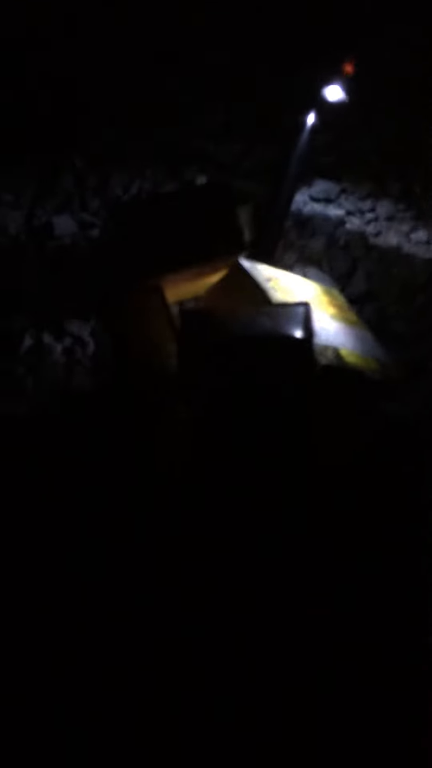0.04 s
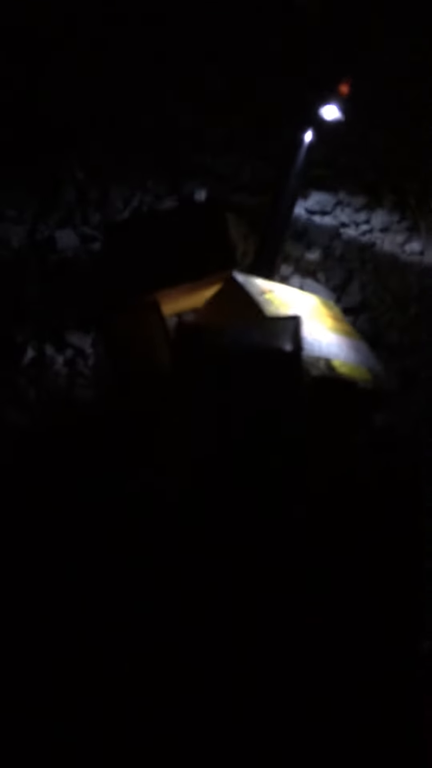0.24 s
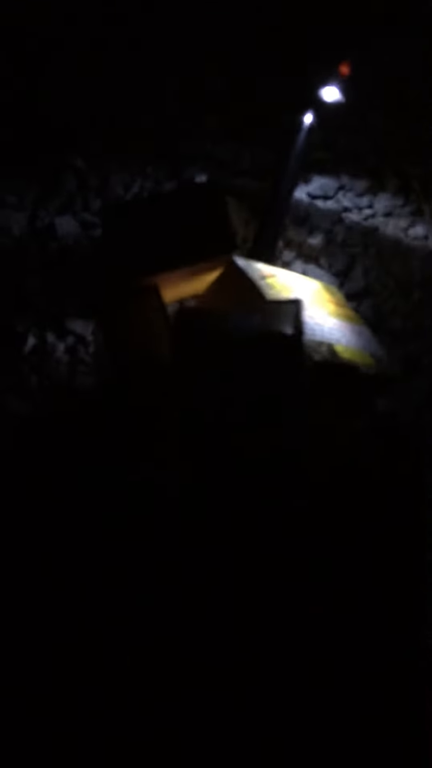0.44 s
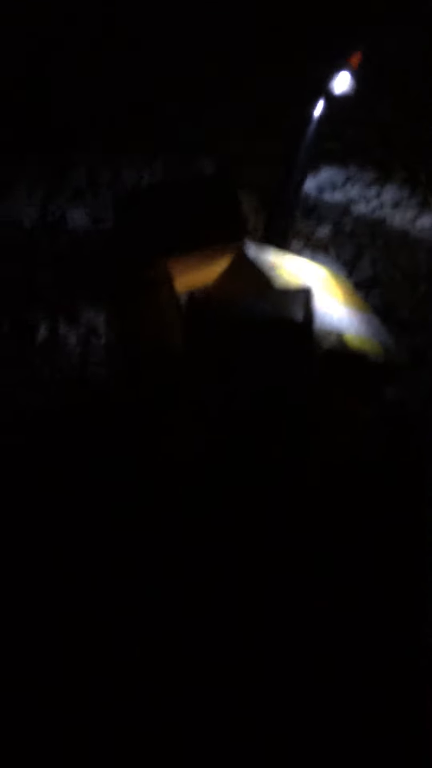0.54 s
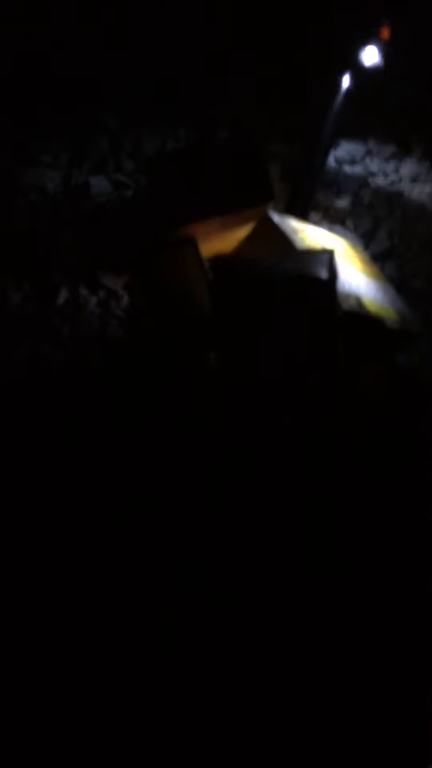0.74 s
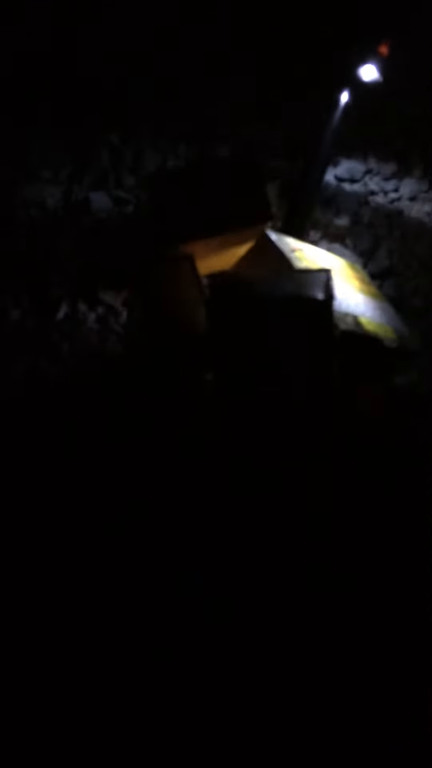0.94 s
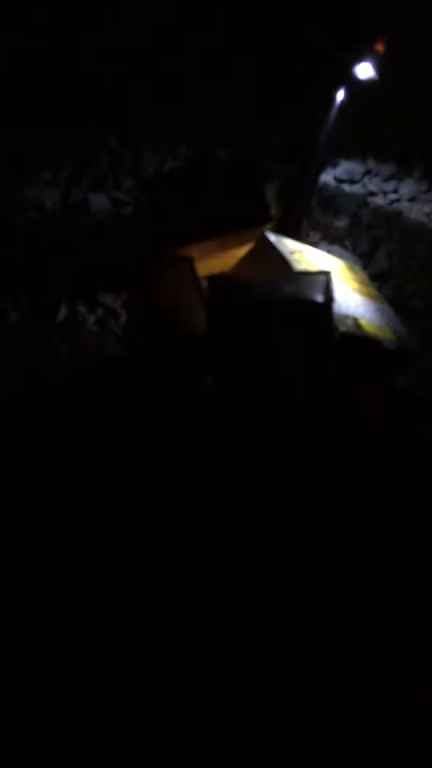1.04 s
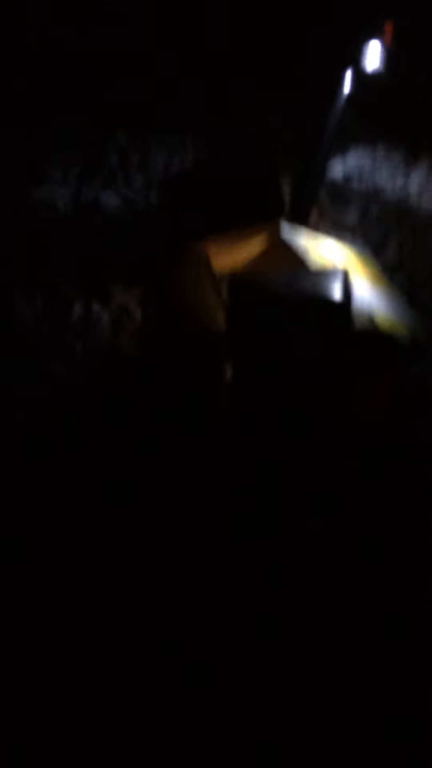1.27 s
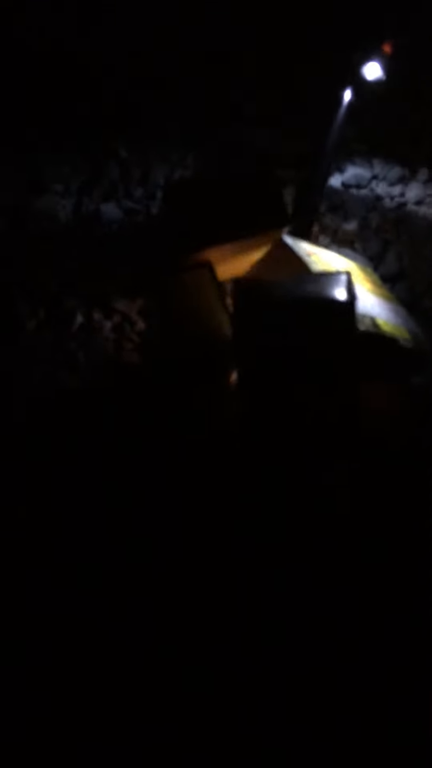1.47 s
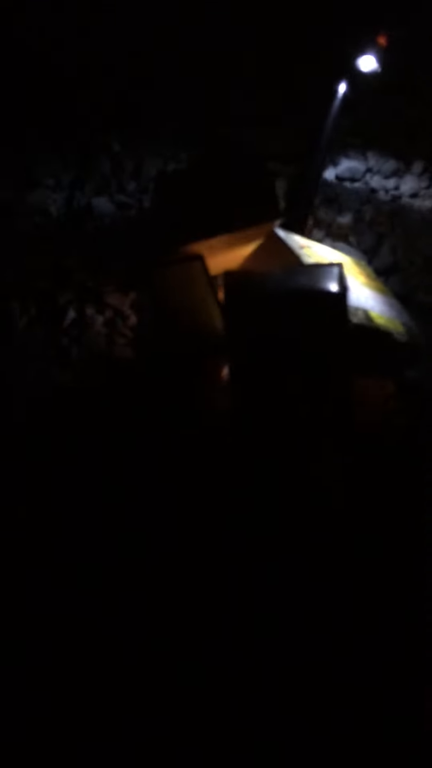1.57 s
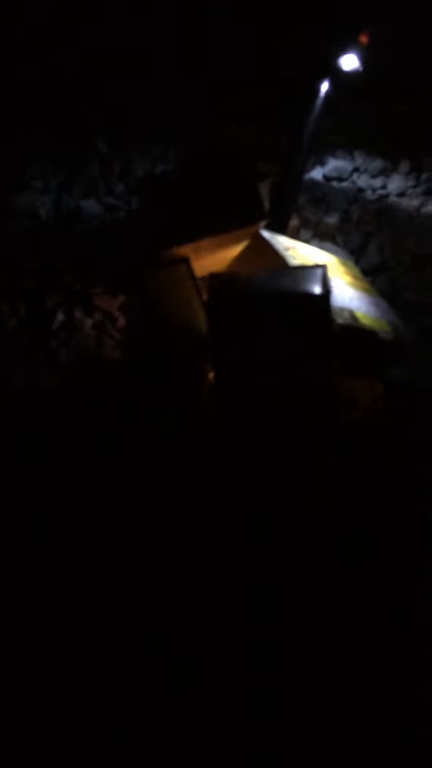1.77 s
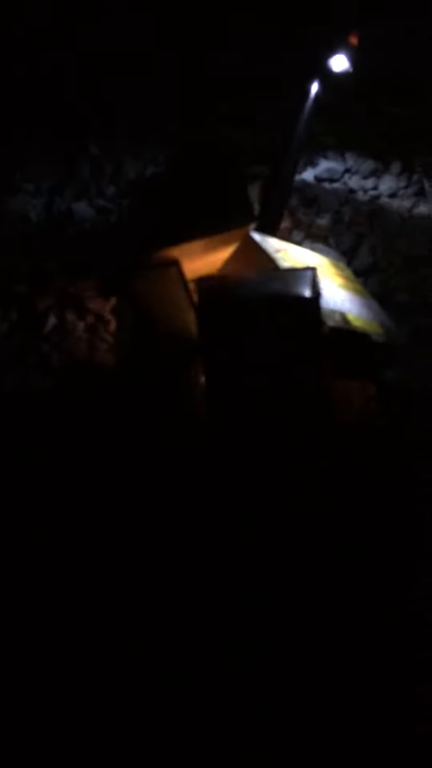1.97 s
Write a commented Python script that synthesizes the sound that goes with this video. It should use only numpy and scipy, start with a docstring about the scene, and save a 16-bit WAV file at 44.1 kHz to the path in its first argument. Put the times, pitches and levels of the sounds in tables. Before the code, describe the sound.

Crickets sing throughout in a dense, high, shimmering trill that swells nearly four times a second, above a steadier lower group and faint, wavering tree crickets. Close by, soft ticks and rustles come around 0.45-0.65 seconds, a short gritty crunch at 0.83-0.9, light rustles from 1.26, and a tiny bright snap at 1.83 with rustling after. Soft outdoor air, thin hiss and distant traffic rumble lie behind.

```python
"""A dense chorus of high crickets swells in step nearly four times a second, over a steady lower group
and a few tree crickets that come and go: random scraper slips ring wing resonances.
Close by, grit crunches and rustles as clusters of tiny grains; ticks and one bright snap are dying modes.
Behind lie soft air, a thin treble hiss and far traffic rumble, all shaped noise."""
import sys
import numpy as np
from scipy import signal
from scipy.fft import rfft, irfft
from scipy.io import wavfile
from scipy.ndimage import uniform_filter1d

SR = 44100
rng = np.random.default_rng(int(sys.argv[2]) if len(sys.argv) > 2 else 0)


def ratio(d):
    """dB to gain"""
    e = np.asarray(d, float) / 20
    return 10 ** e


def store_wav(level_fs):
    """Save 16-bit WAV to argv[1]."""
    pcm = np.round(np.clip(np.atleast_2d(level_fs), -1, 1) * 32767)
    wavfile.write(sys.argv[1], SR, pcm.T.astype(np.int16))


N = 88729  # length in samples

# Cricket groups: pitch_hz (middle), spread_hz (scale between singers), width_hz (wing resonance),
# strokes_per_s, stroke_depth (limited to 0-1), level_db
HIGH_CRICKETS = (7065, 184, 384, 59.5, 0.34, -50)
LOWER_CRICKETS = (6280, 240, 460, 50.5, -3, -60.5)
TREE_CRICKETS = (3024.5, 39.5, 109, 72, .7, -65)
TEETH_PER_S = 1000  # mean scraper slips of each singer
SWELL_PER_S, SWELL_TOP_S, SWELL_DB = 3.705, 1.041, 3  # rate, time near one top, swing up and down
SWELL_SKEW = 0.04  # radians
OVERTONE_DB = -29  # second partial of the high group, relative to the first
# Coming and going of the tree crickets: time_s, level_db (relative, evened to unit rms)
TREE_LEVEL = [(0, -62.5), (.33, -68), (.5, -61.5), (.82, -60), (1.1, -67.5), (1.24, -60), (2.01, -62.5)]

# Crunches of grit: start_s, length_s, level_db, treble_db
CRUNCHES = [(0.8262, 0.017, -56.5, -1), (0.838, 0.0099, -55.5, -16), (0.861, .005, -64, -16),
            (0.875, 0.012, -58.5, -10), (.881, 0.0145, -55, -18)]
# Soft rustles: start_s, length_s, level_db, treble_db
RUSTLES = [(0.458, 0.074, -62.5, -4.5), (0.579, 0.044, -70, 8), (.845, 0.029, -65, -3),
           (1.258, 0.12, -66.5, -2.5), (1.549, 0.032, -68.5, 0), (1.616, 0.068, -67.5, 2),
           (1.853, 0.2, -66, 3), (1.918, 0.036, -69, 17)]
# Colour of the breaking grains: frequency_hz, relative_level_db
GRIT_COLOUR = [(250, -9), (700, 5), (1300, 6), (2300, -0.5), (4000, -0.5), (6000, -1), (9000, -10),
               (15000, -14)]
GRAINS_PER_S, GRAIN_SPREAD_DB, GRAIN_T60_S = 3000, 4, .004
# Single ticks: start_s, level_db (peak before decay), pitch_hz, t60_s
TICKS = [(.4455, -36, 1900, .006), (.47, -42, 1700, .003), (.483, -41, 1200, .005),
         (.637, -37, 3500, .0012), (.8855, -33, 2000, .003), (1.8615, -42, 2300, .003),
         (1.958, -43, 5000, .003)]
# Modes of the snap: pitch_hz, relative_level_db, t60_s
SNAP_MODES = [(2200, -18, 0.0033), (4650, -8, .003), (5400, -8, 0.004), (6800, -4, 0.0018),
              (8560, -1, 0.0039), (10750, 1.5, 0.0064), (12000, -6, 0.0022), (13500, -7, .002)]
SNAP_S, SNAP_DB, SNAP_BREAK_S = 1.8257, -41, 0.0029  # start, level, span of the cracks

# Colour of the soft air: frequency_hz, relative_level_db (per Hz)
AIR_COLOUR = [(180, -1), (300, -2.5), (785, -6.5), (1040, -11), (1320, -9.5), (2590, -15), (2990, -10),
              (3550, -17), (5500, -16.5), (7150, -14), (12100, -120)]
# Colour of the thin treble hiss: frequency_hz, relative_level_db (per Hz)
HISS_COLOUR = [(5000, -8), (7500, -12), (8500, -13), (9600, -8), (10800, -1), (13000, 0), (15300, 0),
               (17000, -3)]
AIR_DB, HISS_DB = -58, -75.5
# Colour of the far traffic: frequency_hz, relative_level_db (per Hz)
RUMBLE_COLOUR = [(12, -47), (20, -47), (49, 1), (85, -1), (152, -1.5), (256, -12), (420, -21), (550, -39),
                 (920, -120)]
# Rise and fall of the far traffic: time_s, level_db
RUMBLE_LEVEL = [(0, -47), (.3, -49.5), (.5, -50.5), (.7, -48.5), (1.15, -49), (1.3, -51), (1.5, -50),
                (1.72, -54), (1.8, -48), (1.92, -45), (2.01, -50)]
PATCH_DB = 1.5  # rms unevenness of the noise over time and frequency

MIC_LOW_HZ, EDGE_HZ = 42, 15320  # microphone bass cut, upper band limit


def evened(x):
    """Scales a sound or gain to unit rms."""
    return x / np.sqrt(np.mean(x ** 2) + 1e-20)


def read(points, hz):
    """Reads a colour table in dB on a log frequency axis, near silent outside it."""
    f, value = np.transpose(points)
    return np.interp(np.log(hz + 1), np.log(f + 1), value, -100, -100)


def level(curve):
    """Turns a (time_s, level_db) curve into a gain for every sample."""
    return ratio(np.interp(np.arange(N) / SR, *np.transpose(curve)))


def add(mix, start_s, sound):
    """Mixes a sound in at its start time."""
    part = mix[round(start_s * SR):][:len(sound)]
    part += sound[:len(part)]


def chorus(hz, spread_hz, width_hz, strokes_per_s, depth, level_db, count, overtone_db=-200):
    """Each singer scrapes its file in wing strokes; the slips ring a wing resonance of its own pitch."""
    t, wing_t = np.arange(N) / SR, np.arange(2048) / SR
    depth = np.clip(depth, 0, 1)
    low, high = 0, 0
    for place, (pace, phase) in zip(np.linspace(-1, 1, count), rng.random((count, 2))):
        stroke_hz = strokes_per_s * (1 + 0.022 * (pace - .5))
        stroke = 1 + depth * np.cos(2 * np.pi * (stroke_hz * t + phase))
        slipping = rng.random(N) < TEETH_PER_S / SR
        slips = stroke * slipping * np.exp(2j * np.pi * rng.random(N))
        pitch_hz = hz + spread_hz * np.arctanh(.95 * place)  # singers crowd around the middle pitch
        wing = wing_t ** 3 * np.exp(np.pi * wing_t * (2j * pitch_hz - width_hz))
        ring = signal.oaconvolve(slips, wing)[:N]
        low = low + ring.real
        high = high + (ring ** 2 / (abs(ring) + 1e-9)).real  # same envelope, doubled phase
    return ratio(level_db) * (evened(low) + ratio(overtone_db) * evened(high))


def crickets():
    """Three groups sing: the high one swells in step, the lower holds, the tree crickets come and go."""
    turn = 2 * np.pi * SWELL_PER_S * (np.arange(N) / SR - SWELL_TOP_S)
    swell = evened(ratio(SWELL_DB * np.cos(turn + SWELL_SKEW * np.cos(turn))))
    high = swell * chorus(*HIGH_CRICKETS, count=16, overtone_db=OVERTONE_DB)
    lower = chorus(*LOWER_CRICKETS, count=10)
    tree = evened(level(TREE_LEVEL)) * chorus(*TREE_CRICKETS, count=5)
    return high + lower + tree


def grit(start_s, length_s, level_db, treble_db):
    """Small grains of uneven size break in a cluster, each with a short scattered tail."""
    n, lead = round(length_s * SR), 128
    grains, t = np.zeros(n + 1024), np.arange(512) / SR
    size = ratio(GRAIN_SPREAD_DB * np.minimum(rng.exponential(1, n), 4)) * rng.choice([-1, 1], n)
    breaking = rng.random(n) < GRAINS_PER_S / SR
    arch = np.sin(np.pi * np.arange(n) / n) ** 0.64  # the cluster fades in and out
    grains[lead:lead + n] = size * breaking * arch
    tail_power = np.convolve(grains ** 2, ratio(-120 * t / GRAIN_T60_S))[:len(grains)]
    grains += 0.24 * rng.standard_normal(len(grains)) * np.sqrt(tail_power)
    hz = np.fft.rfftfreq(len(grains), 1 / SR)
    tilt_db = treble_db * np.clip(np.log2(hz / 2500 + 1e-9), 0, 1)  # reaches treble_db at 5 kHz
    sound = irfft(rfft(grains) * ratio(read(GRIT_COLOUR, hz) + tilt_db), len(grains))
    # the level is the rms over length_s, not over the padded block
    return start_s - lead / SR, ratio(level_db) * evened(sound) * np.sqrt(len(grains) / n)


def ping(hz, level_db, t60_s):
    """One mode starts within 0.12 ms and dies away exponentially."""
    t = np.arange(1500) / SR
    return ratio(level_db - 60 * t / t60_s) * np.minimum(t / 0.00012, 1) * np.sin(2 * np.pi * hz * t)


def snap():
    """A first crack and weaker ones in quick succession ring the modes of a small hard thing."""
    at, size = rng.random((6, 2)).T
    cracks = np.zeros(round(SNAP_BREAK_S * SR) + 1)
    cracks[(at * SNAP_BREAK_S * SR).astype(int)] = .45 * (2 * size - 1)
    cracks[0] = 1
    modes = sum(ping(*mode) for mode in SNAP_MODES)
    return ratio(SNAP_DB) * np.convolve(cracks, modes)


def nearby():
    """Places the grain clusters, the single-mode ticks and the bright snap in time."""
    mix = np.zeros(N)
    for row in CRUNCHES + RUSTLES:
        add(mix, *grit(*row))
    for start_s, level_db, hz, t60_s in TICKS:
        add(mix, start_s, ping(hz, level_db, t60_s))
    add(mix, SNAP_S, snap())
    return mix


def noise(colour):
    """Random short-time spectra follow a colour, with patches drifting in level; unit rms."""
    frames, hz = N // 512 + 5, np.fft.rfftfreq(2048, 1 / SR)
    a, b, patches = rng.standard_normal((frames, len(hz), 3)).T
    patches = uniform_filter1d(patches, size=16, axis=0)  # across frequency
    patches = evened(uniform_filter1d(patches, size=6, axis=1))  # across time
    spectra = (a + 1j * b) * ratio(read(colour, hz)[:, None] + PATCH_DB * patches)
    return evened(signal.istft(spectra, nperseg=2048, noverlap=1536)[1][:N])


def air():
    """Soft outdoor air is broad noise falling towards the treble."""
    return ratio(AIR_DB) * noise(AIR_COLOUR)


def hiss():
    """A thin hiss is faint noise, strongest at the top of the treble."""
    return ratio(HISS_DB) * noise(HISS_COLOUR)


def rumble():
    """Far traffic is low noise that rises and falls in level."""
    return level(RUMBLE_LEVEL) * noise(RUMBLE_COLOUR)


def scene():
    """Everything sums at one microphone."""
    return (crickets() + nearby() + air() + hiss() + rumble())[None]


def roll_off(x):
    """The treble ends steeply here."""
    return signal.sosfilt(signal.butter(12, 15740, fs=SR, output="sos"), x)


def record(dry):
    """The microphone cuts the bass, and a steep filter limits the treble."""
    bass_cut = signal.butter(2, MIC_LOW_HZ, "high", fs=SR, output="sos")
    band_limit = signal.firwin(1023, EDGE_HZ, window=("kaiser", 9), fs=SR)
    mix = signal.sosfilt(bass_cut, dry)
    mix = signal.oaconvolve(mix, band_limit[None], "same")
    return roll_off(mix)


dry = scene()
out = record(dry)
store_wav(out)
```